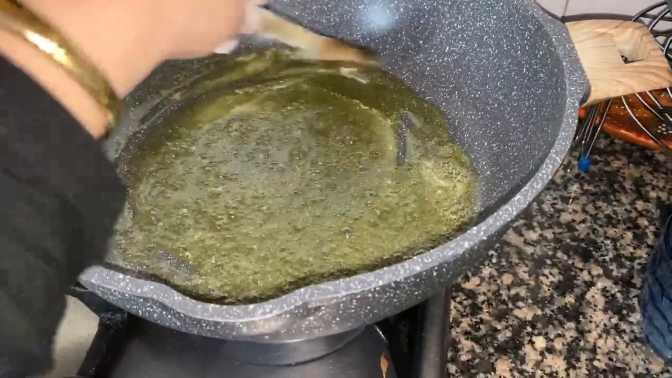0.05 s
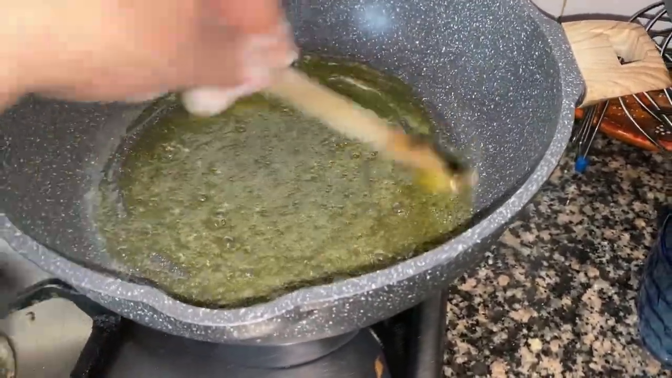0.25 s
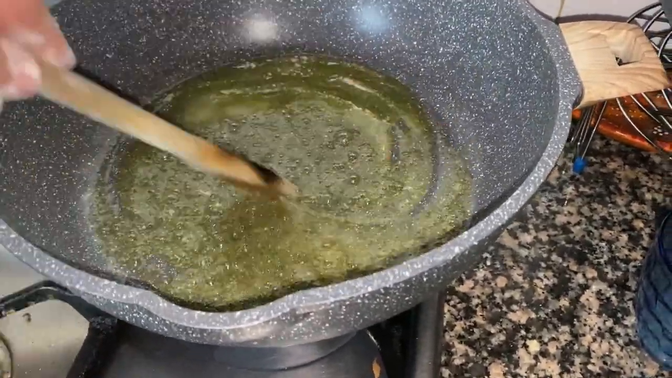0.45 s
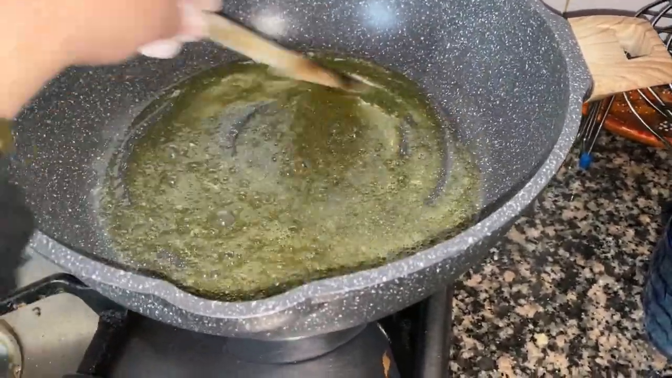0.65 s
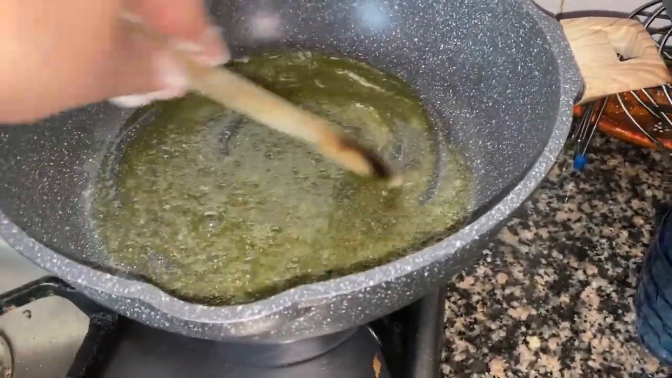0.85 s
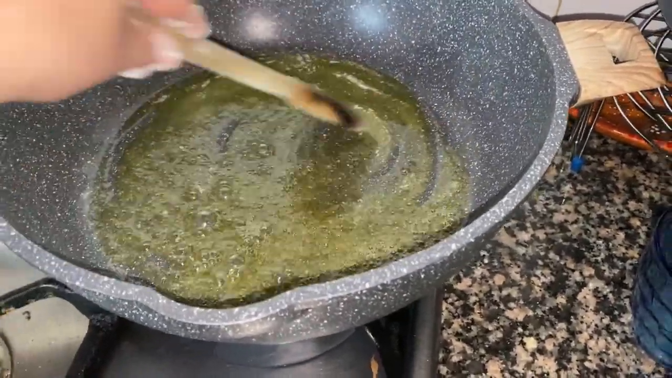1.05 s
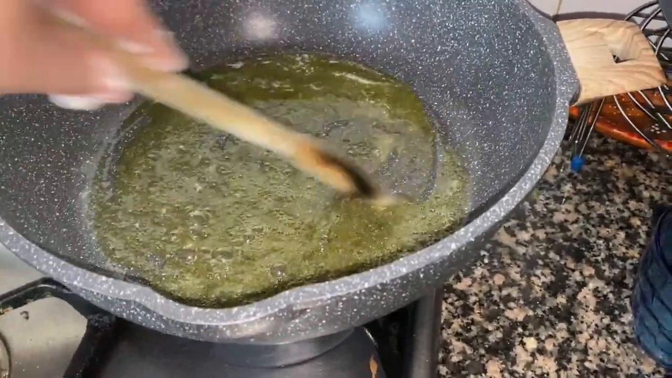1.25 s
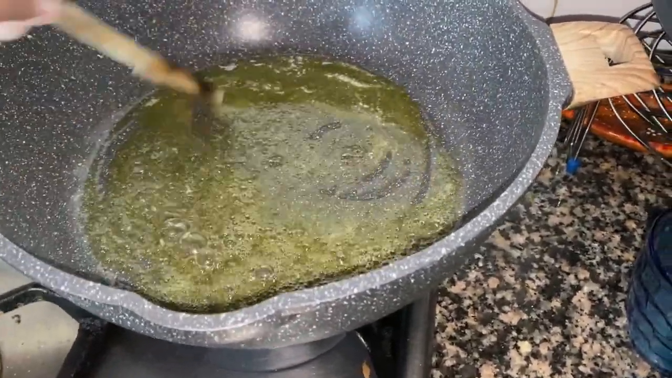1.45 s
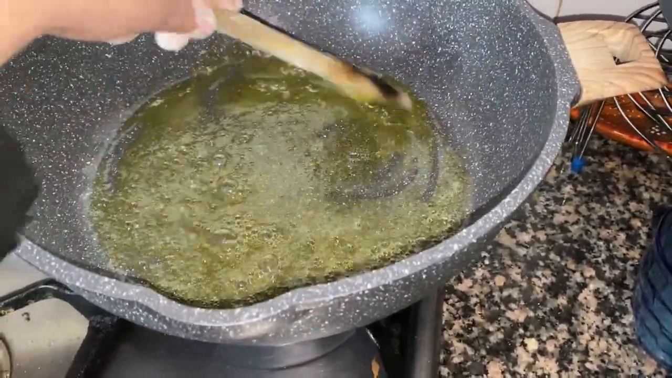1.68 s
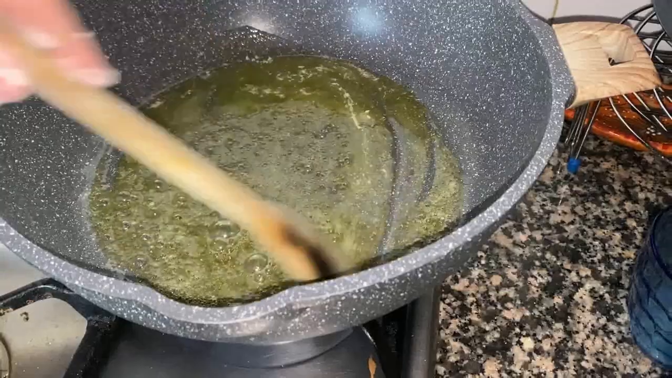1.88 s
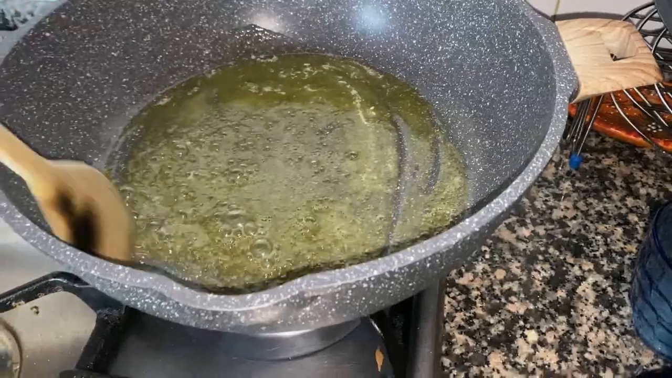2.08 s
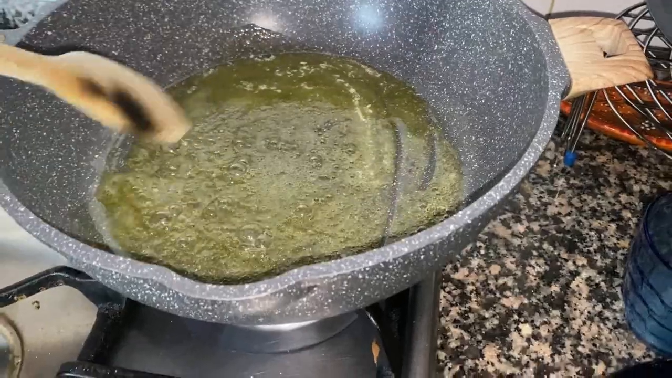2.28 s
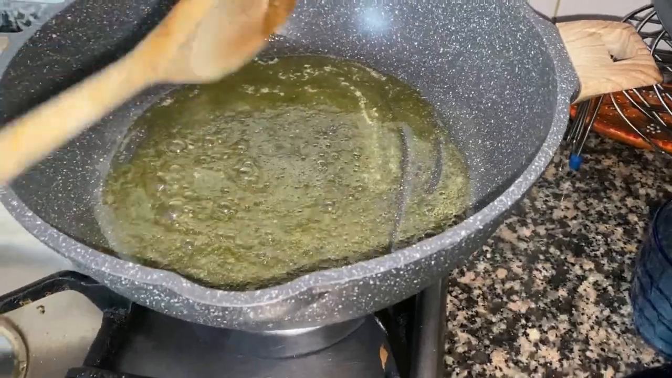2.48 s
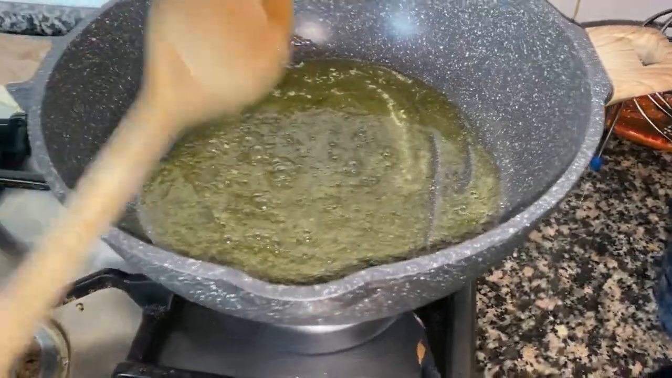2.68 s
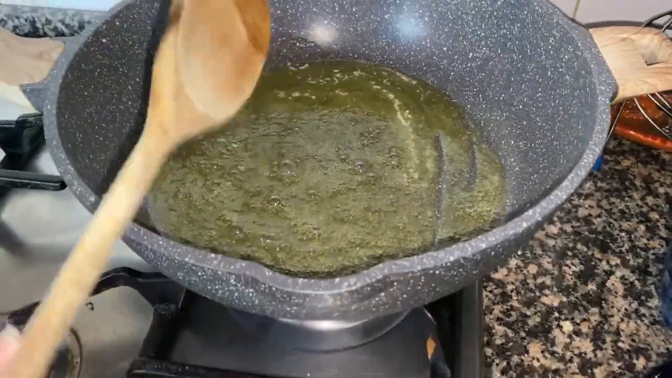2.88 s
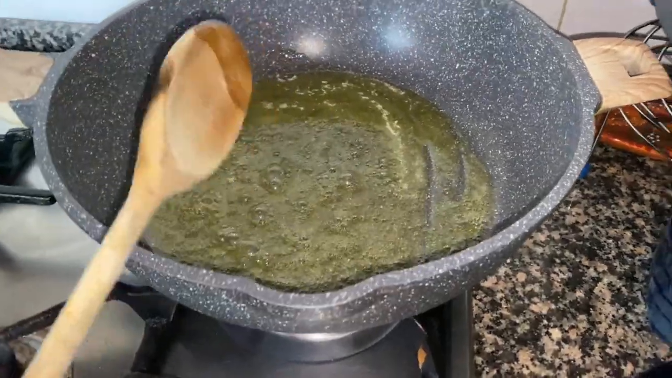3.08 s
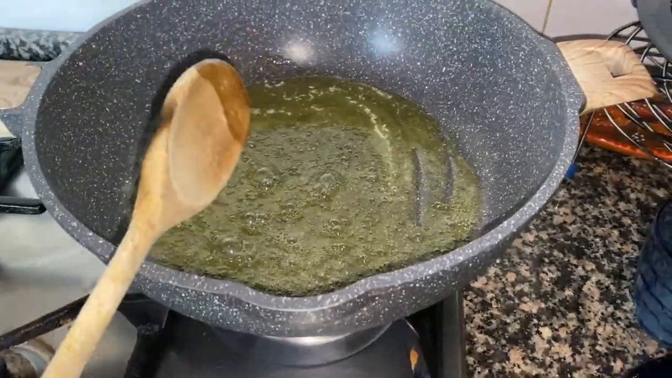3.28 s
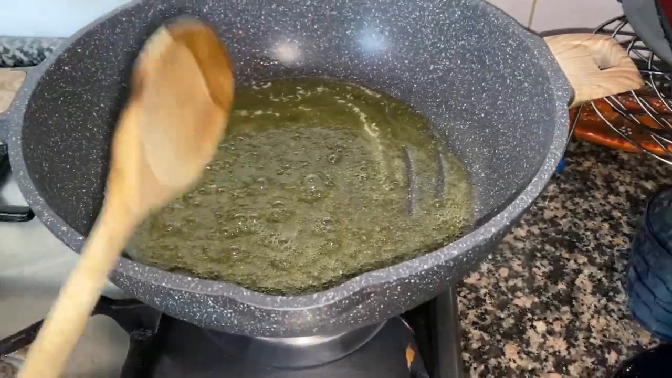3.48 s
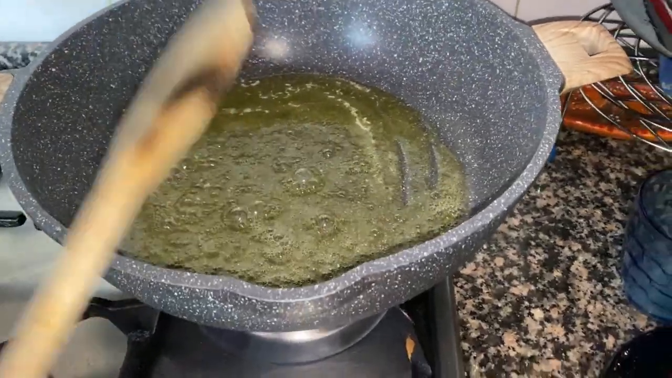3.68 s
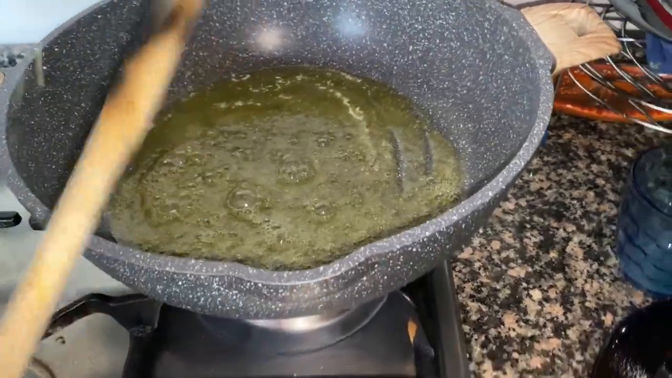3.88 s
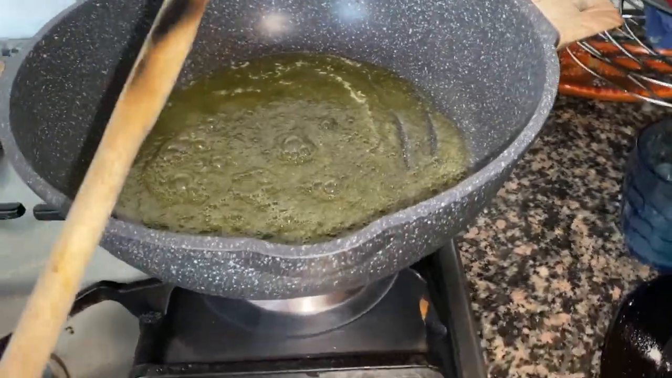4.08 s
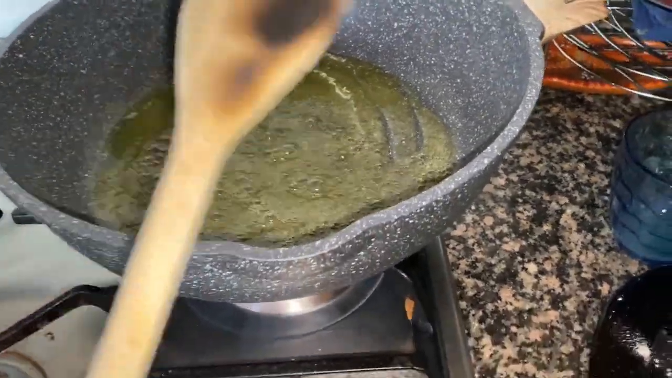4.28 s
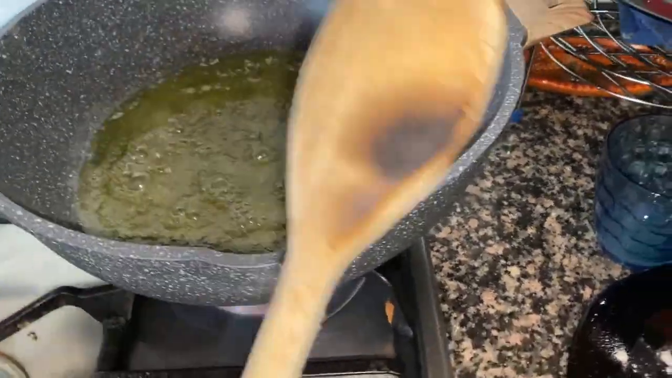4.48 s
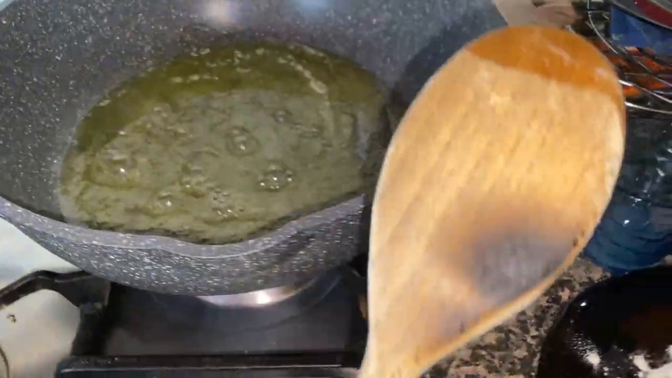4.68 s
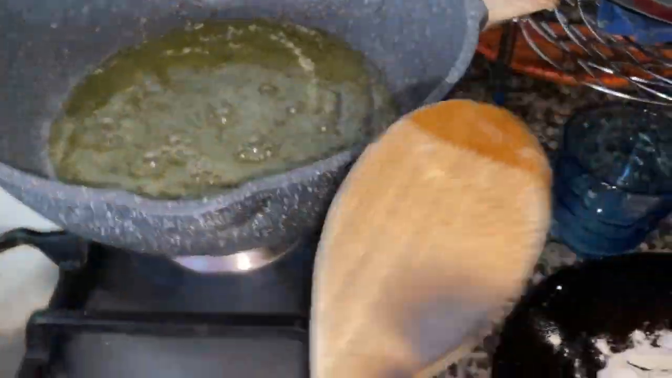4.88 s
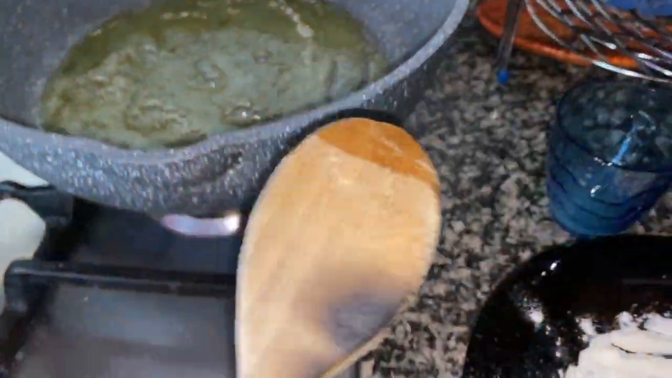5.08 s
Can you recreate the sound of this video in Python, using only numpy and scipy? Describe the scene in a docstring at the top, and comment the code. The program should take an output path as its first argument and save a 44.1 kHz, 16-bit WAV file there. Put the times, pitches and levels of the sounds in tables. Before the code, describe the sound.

Butter sizzles softly in oil in a pan, a fine hiss and crackle with occasional sharp spits over a faint gas flame. A wooden spoon scrapes around the bottom in several strokes and bumps the side. It is then knocked four times on the rim, each a woody clack with a short metallic ring. The sizzle carries on more quietly. It is a small kitchen, and the close hand-held microphone rumbles a little at first.

```python
"""Butter sizzling in a pan, stirred with a wooden spoon

Butter foams softly in oil in a non-stick pan over a gas flame, in a small kitchen. Its water boils out
as hiss and crackle, and now and then a trapped drop spits. A wooden spoon sticks and slips round the
pan, bumps its wall, then is knocked four times on the rim: the metal rings, the wood clacks and the
grate shakes. The hand-held microphone rumbles a little."""
import sys
import numpy as np
from scipy import signal
from scipy.fft import rfft, irfft
from scipy.io import wavfile
from scipy.ndimage import uniform_filter1d

SR = 44100
rng = np.random.default_rng(int(sys.argv[2]) if len(sys.argv) > 2 else 0)


def store_wav(level_fs):
    """Save 16-bit WAV to argv[1]."""
    pcm = np.round(np.clip(np.atleast_2d(level_fs), -1, 1) * 32767)
    wavfile.write(sys.argv[1], SR, pcm.T.astype(np.int16))


N = 226718
TIME = np.arange(N) / SR


def from_db(db):
    """Decibels to amplitude."""
    return 10 ** (np.asarray(db) / 20)


def rms_one(x):
    """Scales a sound to rms 1."""
    return x / np.sqrt(np.mean(x ** 2) + 1e-20)


def evened(x, window_s):
    """Holds the running level of a stereo sound at 1."""
    return x / np.sqrt(uniform_filter1d(np.mean(x ** 2, axis=0), int(window_s * SR)) + 1e-12)


def in_time(points):
    """Reads a curve at every sample."""
    return np.interp(TIME, *np.transpose(points))


def at_hz(points, hz):
    """Reads a curve on a log-frequency axis."""
    f, value = np.transpose(points)
    return np.interp(np.log(np.maximum(hz, 1)), np.log(f), value)


def add(out, s, sound):
    """Mixes a sound in at time s."""
    i = max(round(s * SR), 0)
    out[:, i:i + sound.shape[1]] += sound[:, :N - i]


def colour(x, spectrum):
    """Gives a steady sound a spectrum; rms 1."""
    gain = from_db(at_hz(spectrum, np.fft.rfftfreq(N, 1 / SR)))
    return rms_one(irfft(rfft(x) * gain, N))


def low_pass(x, hz):
    """Dulls a sound by 12 dB an octave above hz."""
    return signal.sosfilt(signal.butter(2, min(hz, .45 * SR), fs=SR, output="sos"), x)


def resonate(x, hz, width):
    """A resonance with gain 1 at its peak."""
    r = np.exp(-np.pi * width / SR)
    poles = [1, -2 * r * np.cos(2 * np.pi * hz / SR), r * r]
    return signal.lfilter(np.array([1, 0, -1]) * (1 - r * r) / 2, poles, x + 1e-18)


def body(x, resonances):
    """Parallel resonances of alternating sign; rms 1."""
    return rms_one(sum((-1) ** k * from_db(db) * resonate(x, hz, width)
                       for k, (hz, width, db) in enumerate(resonances)))


def drift(rate):
    """A random wander through `rate` points a second; rms 1."""
    knots = rng.standard_normal(N // 40)
    return rms_one(np.interp(TIME * rate, np.arange(len(knots)), knots))


def grains(per_s, spread_db):
    """Random clicks, a few of them much larger than the rest."""
    sizes = from_db(spread_db * np.minimum(rng.exponential(1, N), 5)) * rng.choice([-1, 1], N)
    return sizes * (rng.random(N) < per_s / SR)


def dying_noise(spectrum, t60s, rise_s, size):
    """Countless modes: stereo noise that swells, then dies band by band; energy 1 a channel."""
    t, hz = TIME[:size], np.fft.rfftfreq(size, 1 / SR)
    noise = np.exp(2j * np.pi * rng.random((2, len(hz)))) * from_db(at_hz(spectrum, hz))
    out = 0
    for k, (_, t60) in enumerate(t60s):
        share = at_hz([(f, j == k) for j, (f, _) in enumerate(t60s)], hz)
        out = out + irfft(noise * share, size) * from_db(-60 * t / t60)
    return rms_one(out * (1 - np.exp(-t / rise_s))) / np.sqrt(size)


def kitchen(x):
    """A small tiled room: a short tail whose treble dies first."""
    # tone of the tail: f/Hz, level/dB
    tone = [(60, -26.5), (500, 5), (900, 0), (2000, -1), (5000, 3.5), (9000, -2), (16000, 6.5)]
    # decay of the tail: f/Hz, t60/s
    decay = [(100, 0.66), (1000, 0.49), (4000, 0.35), (16000, 0.15)]
    tail = dying_noise(tone, decay, rise_s=0.0054, size=30000)
    return signal.fftconvolve(x, tail, axes=1)[:, :N]


def handling(thump_s=0.019, apart=0.96):
    """The hand on the microphone shifts with the stirring: a low rumble with soft thumps."""
    # rumble of the moving hand: t/s, level/dB
    rumble = [(0, -45), (.3, -64), (1.12, -63), (1.35, -43), (1.75, -54.5), (2.05, -57), (2.35, -78.5)]
    # thumps of the hand: t/s, level/dB
    bumps = [(0.029, -29), (.785, -47), (1.232, -37.5), (1.306, -36.5), (1.361, -28), (1.45, -40),
             (1.579, -42)]
    # tone of both: f/Hz, level/dB
    tone = [(20, -29.5), (45, -4), (80, -0.5), (115, -4.5), (190, -15), (300, -37), (600, -55.5)]
    thumps = sum(from_db(db) * np.exp(-.5 * ((TIME - s) / thump_s) ** 2) for s, db in bumps)
    envelope = np.hypot(from_db(in_time(rumble)), thumps)
    shake = rng.standard_normal(N) + apart * rng.standard_normal((2, N))
    return envelope * evened(colour(shake, tone), window_s=0.043)


def flame(roar_db=-58, hollow_db=-59):
    """The gas burner roars softly through the hollows under the pan."""
    # tone of the flame: f/Hz, level/dB
    tone = [(25, -17), (60, 4.5), (130, -0.5), (300, 4), (600, 0.5), (900, -3), (1400, -9.5), (2200, -17),
            (4000, -15), (8000, -15)]
    # resonances under the pan: f/Hz, width/Hz, level/dB
    hollows = [(573, 36, -3), (1050, 20.5, -4.5), (1692, 19.4, -4.5), (2630, 30, -14.5)]
    roar = colour(rng.standard_normal((2, N)), tone)
    hollow = body(rng.standard_normal((2, N)), hollows)
    return from_db(roar_db) * roar + from_db(hollow_db) * hollow


def spit(peak_db, hz, t60, q=4.8, snap_db=-2, snap_s=0.00032):
    """A trapped drop flashes to steam: a snap and a short pitched fizz."""
    t = TIME[:2000]
    envelope = from_db(-60 * t / t60) + from_db(snap_db) * np.exp(-t / snap_s)
    puff = rng.standard_normal((2, len(t))) * envelope
    fizz = resonate(resonate(puff, hz, hz / q), hz, 2 * hz / q)
    return from_db(peak_db) * fizz / np.abs(fizz).max()


def sizzle(flicker_db=3.1, crackle_db=-5, bubble_q=6, fizz_db=4.5, drops=200):
    """Water boils out of the butter: fine foam hisses, bubbles burst in brief pings, tiny drops fizz."""
    # fader ride of the frying: t/s, level/dB
    ride = [(0.0, -53), (0.96, -53.5), (1.98, -51.5), (2.45, -54.5), (3.06, -52), (4.29, -57.5),
            (4.39, -57.5), (5.14, -61)]
    # tone of foam and crackle: f/Hz, level/dB
    tone = [(1000, -4.5), (2000, -4), (3500, -4.5), (5200, -0.5), (7000, 0.5), (9000, -3), (11000, -1.5),
            (13000, -7.5), (15500, -4.5), (16500, -20.5)]
    foam = colour(rng.standard_normal((2, N)), tone) * from_db(flicker_db * drift(rate=90))
    bursts = grains(per_s=1900, spread_db=8.5)
    pitches = np.geomspace(3500, 15000, num=14)
    pitch_index = rng.integers(0, len(pitches), N)
    bursts = bursts * (1 + 2.5 * rng.standard_normal((2, N)))  # scattered in stereo
    crackle = sum(resonate(bursts * (pitch_index == k), hz, hz / bubble_q) / np.sqrt(hz)
                  for k, hz in enumerate(pitches))
    fizz = np.zeros((2, N))
    for when, size, pitch, length in rng.random((drops, 4)):
        drop = spit(fizz_db + 9 * size ** 2, hz=4800 * 2.7 ** pitch, t60=.008 + .035 * length)
        add(fizz, when * TIME[-1], drop)
    return from_db(in_time(ride)) * (foam + from_db(crackle_db) * colour(crackle, tone) + fizz)


def spits(spit_gain_db=2.0, crack_gain_db=6, crack_s=.0013, crack_hz=11000, cycles=243):
    """Larger drops stand out of the sizzle, some with a bright crack; small, high ones die sooner."""
    # spits of fat: t/s, relative peak/dB, f/Hz, relative crack/dB
    drops = [(0.0478, -28, 6240, -50), (0.5677, -33, 6900, -36), (1.2712, -25, 5420, -57),
             (1.6149, -38, 4270, -47), (1.665, -23, 7800, -55), (2.347, -38.5, 5020, -55),
             (2.4347, -40, 5500, -57), (2.5915, -33.5, 7950, -35), (2.7025, -30.5, 5330, -54),
             (2.803, -34.5, 10900, -57), (3.8213, -42, 8100, -34.5), (3.862, -35, 8000, -47.5),
             (3.9956, -31.5, 10700, -58), (4.0602, -34.5, 10500, -50), (4.126, -28.5, 5370, -48),
             (4.155, -31, 7400, -49), (4.2717, -33, 6940, -62), (4.7232, -31, 11000, -41),
             (4.8447, -32.5, 7960, -49), (4.897, -29, 7180, -42), (4.989, -38, 11200, -53.5)]
    out, t = np.zeros((2, N)), TIME[:700]
    for s, db, hz, crack_db in drops:
        add(out, s, spit(db + spit_gain_db, hz, t60=cycles / hz))
        burst = rng.standard_normal((2, len(t))) * np.exp(-t / crack_s)
        add(out, s, from_db(crack_db + crack_gain_db) * resonate(burst, crack_hz, width=crack_hz))
    return out


def sweeps(fade_db=12.5, roundness=1.4):
    """Spoon strokes swell and ease off: gains of rub, singing and scratch, and a gliding colour in Hz."""
    # strokes over the pan's bottom: t/s of most pressure, rise/s, fall/s, rub/dB, singing/dB,
    # scratch/dB, scratch colour/Hz, glide/(octaves per s)
    strokes = [(0.049, 0.015, 0.034, -44, -44, -40, 2900, 14),
               (0.182, 0.078, 0.087, -46, -46, -40, 3200, -0.5),
               (.38, 0.21, 0.067, -39.5, -69, -45, 2280, 0), (.53, 0.17, .12, -41, -39, -42, 1470, -7),
               (.655, 0.021, 0.05, -36, -62, -53, 1200, 0),
               (.86, 0.14, 0.37, -49, -58.5, -52.5, 2070, -0.5),
               (1.392, .15, 0.26, -40.5, -46.5, -45, 1650, -1),
               (1.89, 0.21, 0.21, -39, -46, -44, 2160, -2.5), (2.09, 0.055, 0.13, -64, -71, -46.5, 2740, 0)]
    s, rise, fall, rub_db, sing_db, scratch_db, hz, glide = np.transpose(strokes)[:, :, None]
    t = TIME - s
    away = np.minimum(np.maximum(-t / rise, t / fall), 5)  # rise or fall times from the peak
    power = from_db(-fade_db * away ** roundness) ** 2 + 1e-20
    rub, sing, scratch = (np.sqrt(np.sum(power * from_db(db) ** 2, axis=0))
                          for db in (rub_db, sing_db, scratch_db))
    octave = np.average(np.log2(hz) + glide * np.clip(t, -rise, fall), axis=0, weights=power)
    return rub, sing, scratch, 2 ** octave


def stirring(sing_db=-1, scratch_db=-1, jerk_db=2, boost_db=10, boost_octaves=0.78, wall_echo=0.1):
    """Wood sticks and slips over the speckled coating: dense uneven clicks into the pan's resonances."""
    # hollow rub: f/Hz, width/Hz, level/dB
    rub_modes = [(205, 9.7, -8), (327, 133, -7.5), (411, 216, -11.5), (534, 33, 4), (588.3, 48, -2.5),
                 (700, 24, -11.5)]
    # singing of the wall: f/Hz, width/Hz, level/dB
    sing_modes = [(884, 14.3, 0.5), (935, 88, -15.5)]
    # gritty scratch: f/Hz, width/Hz, level/dB
    scratch_modes = [(1160, 130, -3.5), (1454, 37, 6.5), (1605, 20, 9.5), (1900, 290, -8), (2200, 67, 2.5),
                     (2530, 380, -4), (3500, 790, -3), (4330, 3500, -7)]
    rub, sing, scratch, centre_hz = sweeps()
    slips = np.array([grains(per_s=3800, spread_db=3.5) for _ in range(2)])
    slips *= from_db(jerk_db * drift(rate=40))
    # the echo off the pan wall comes later as the spoon moves away from it, so the colour glides
    echoed = slips + wall_echo * np.array([np.interp(TIME - 1 / centre_hz, TIME, side) for side in slips])
    grit = 0
    for k, (hz, width, db) in enumerate(scratch_modes):
        near = np.exp(-.5 * (np.log2(hz / centre_hz) / boost_octaves) ** 2)
        grit = grit + (-1) ** k * from_db(db + boost_db * near) * resonate(echoed, hz, width)
    layers = [(rub, body(slips, rub_modes)),
              (sing * from_db(sing_db), body(slips, sing_modes)),
              (scratch * from_db(scratch_db), grit)]
    lean_left = from_db([[1.0], [-1.0]])
    return lean_left * sum(gain * evened(x, window_s=0.06) for gain, x in layers)


def pan_ring(wall_db, bottom_db, grate_db, sustain, scatter_db=2.64, swell_s=0.014):
    """Each touch strikes every mode of the pan and grate with a strength of its own; low modes swell slowly."""
    # modes of pan and grate: f/Hz, level/dB, nominal t60/s, left minus right/dB, left lead/rad
    modes = [(102.2, -38, 3.4, 0, -8.7), (131.2, -36, 0.69, 17, -3.4), (209.5, -38, 1.7, -2.5, 4.1),
             (312.5, -34.5, 0.53, -0.5, 0.5), (486, -24, 0.38, -13.5, -0.7), (507.4, -21.5, 0.61, -1, 1.4),
             (539, -22.5, 0.3, 2.5, -1.5), (887.8, -10.5, 0.22, 9.5, 0.72), (887, -34, 0.17, -8, -8.5),
             (1060, -43, 0.21, -5.5, 4), (1175, -40, 0.1, -23, 2.7), (1346, -36, 0.14, -3, 12.5),
             (1422, -25.5, 0.45, -5.5, 2.4), (1423, -26.5, 0.13, 4, 8.2), (1581, -26.5, 0.35, 17, 1.1),
             (1736, -21, 0.14, 9, 0), (1850, -32, 0.16, 0, -4.5), (2150, -20.5, 0.12, -9, 1.4),
             (2510, -31, 0.41, 0.5, 6), (3167, -30, 0.3, 8.5, 0.2), (3265, -30.5, 0.27, 7, -0.2),
             (3673, -47, 0.29, 6, -20.5), (4500, -40, 0.18, 5, 3), (4710, -27.5, .15, 12, -3.5),
             (6600, -40, 0.16, -3, -1)]
    hz, db, t60, lean_db, lead = np.transpose(modes)[:, :, None]
    t, sides = TIME[:36000], np.array([.5, -.5])
    # from low to high: the grate shakes, the pan's bottom flexes, its wall rings
    db = db + np.select([hz < 250, hz < 700], [grate_db, bottom_db], wall_db)
    db = db + scatter_db * rng.standard_normal((len(modes), 1))
    strength = from_db(db + sides * lean_db) * np.exp(1j * sides * lead)
    rise_s = swell_s / (1 + (hz / 750) ** 4)
    swell = 1 - np.exp(-t / rise_s)
    swing = swell * np.exp((2j * np.pi * hz - np.log(1000) / (t60 * sustain)) * t)
    signs = (-1) ** np.arange(len(modes))[:, None]
    return np.real((signs * strength).T @ swing)


def knocks(clack_db=17.5, thud_db=10, spoon_db=3, spoon_q=26.0, lifted_s=2.5, last_knock_s=3.4):
    """The wood clacks and the pan rings, duller for a soft touch; the grate's thud swells just behind."""
    # a brief harder rub of the spoon at 0.65 s, then bumps on the wall and knocks on the rim:
    # t/s, wall ring/dB, bottom hum/dB, wood/dB (all three relative), contact cut-off/Hz
    contacts = [(.648, -41, -30, -32.5, 650), (.765, -20, -20, -39, 990), (1.638, -21, -16.5, -21, 700),
                (1.666, -41, -28, -30.5, 1980), (1.9939, -5, -8, -15.5, 1490),
                (2.8615, -7, -4.5, -1.5, 3030), (2.8700, 0.5, -6, -6.5, 11000),
                (2.8972, -19.5, -14, -12.5, 6000), (3.0619, 0, 1, -1, 6230), (3.1062, -12, -1, -8.5, 8300),
                (3.2572, 0.5, -3, -3.5, 5230), (3.2656, -13, -27, -3.5, 12100),
                (3.465, -1.5, 4, -4.5, 4370), (3.4717, -21, -46, -7, 9560), (3.4890, -43, -33, -12.5, 6400)]
    # dense clack of spoon and pan together: f/Hz, level/dB
    clack_tone = [(300, -20.5), (500, 1.5), (720, -14.5), (1050, 0), (1250, -0.5), (1700, 1.5), (2500, 0.5),
                  (2850, -4.5), (3400, -0.5), (5200, -4), (7500, -4), (9500, -7), (16000, -17)]
    # its decay: f/Hz, t60/s
    clack_decay = [(300, 0.23), (1500, 0.14), (4000, 0.075), (8000, 0.054), (16000, 0.041)]
    # thud of the grate and hob: f/Hz, level/dB
    grate_tone = [(30, -32), (50, -6), (70, -1), (140, 5), (200, 3.5), (250, -1.5), (330, 3.5), (500, -8.5),
                  (700, -8.5), (1200, -52)]
    # its decay: f/Hz, t60/s
    grate_decay = [(40, 1), (110, 0.75), (200, 0.34), (700, 0.23)]
    rings, impacts = np.zeros((2, 2, N))
    for s, wall_db, bottom_db, wood_db, contact_hz in contacts:
        # the spoon damps the ring: most when resting in the pan, less rebounding, least lifted clear
        sustain = 0.52 if s < lifted_s else 0.76 if s < last_knock_s else 1.04
        ring = pan_ring(wall_db, bottom_db, wood_db, sustain)
        add(rings, s, low_pass(ring, contact_hz))
        spoon_hz = 650 + 0.297 * contact_hz  # a harder contact wakes a higher resonance of the spoon
        clack = dying_noise(clack_tone, clack_decay, rise_s=0.00019, size=12000)
        clack = clack + from_db(spoon_db) * resonate(clack, spoon_hz, spoon_hz / spoon_q)
        add(impacts, s, from_db(wood_db + clack_db) * low_pass(clack, contact_hz))
        thud = dying_noise(grate_tone, grate_decay, rise_s=0.0063, size=36000)
        add(impacts, s, from_db(wood_db + thud_db) * thud)
    fade = from_db(np.interp(TIME, [3.65, 3.8], [0, -5]))  # the last ring drops away quickly
    return impacts, rings * fade


def scene(impact_send_db=-6.0, ring_send_db=-14, spit_send_db=-12):
    """The pan's ring stays nearly dry; the knocks and spits fill the room more."""
    impacts, ring = knocks()
    spitting = spits()
    send = (from_db(impact_send_db) * impacts + from_db(ring_send_db) * ring
            + from_db(spit_send_db) * spitting)
    return impacts + ring + spitting + kitchen(send) + stirring() + sizzle() + flame() + handling()


def record(dry, cutoff_hz=16400):
    """Two microphone ports narrow the image, their treble out of step; peaks are rounded, the top cut."""
    # stereo width: f/Hz, side level/dB
    side_levels = [(40, -11.5), (150, -7.5), (500, -5.5), (1200, -3), (3000, -1.5), (6500, -3.5),
                   (8500, -22), (13000, 0), (16000, -10.5)]
    # balance of the ports: f/Hz, left minus right/dB
    balance = [(60, 0.5), (200, 0), (550, 3), (900, 3), (1600, 0.5), (4000, 0.5), (8000, 0), (16000, 0)]
    # phase between the ports: f/Hz, left lead/rad
    phase = [(0, 0), (1900, 0), (2700, 1.2), (3700, .3), (5200, -.5), (7200, .2), (9100, -3.14),
             (11200, -6.28), (13400, -9.42), (15600, -12.57), (17000, -13.5)]
    hz = np.fft.rfftfreq(N, 1 / SR)
    left, right = rfft(dry)
    width = from_db(at_hz(side_levels, hz))
    narrowed = (left + right + width * (left - right) * [[1], [-1]]) / np.sqrt(2 + 2 * width ** 2)
    sides = np.array([[.5], [-.5]])
    lead = np.interp(hz, *np.transpose(phase))
    ports = from_db(sides * at_hz(balance, hz)) * np.exp(1j * sides * lead)
    rounded = np.tanh(irfft(narrowed * ports, N))
    return signal.sosfilt(signal.ellip(10, .2, 80, cutoff_hz, fs=SR, output="sos"), rounded)


dry = scene()
out = record(dry)
store_wav(out)
```